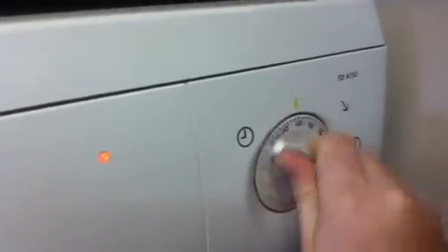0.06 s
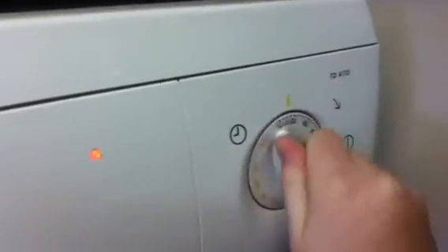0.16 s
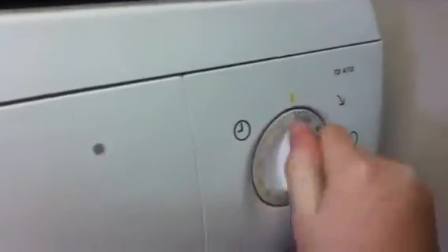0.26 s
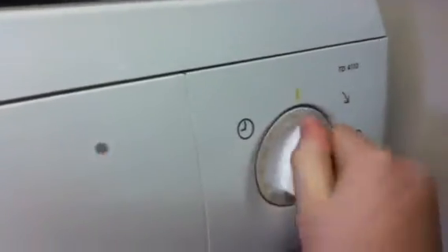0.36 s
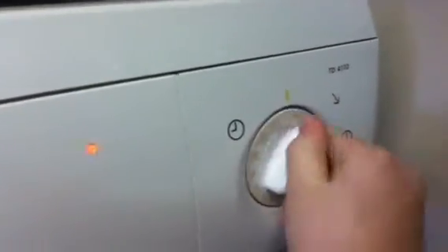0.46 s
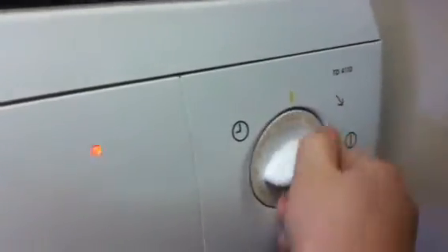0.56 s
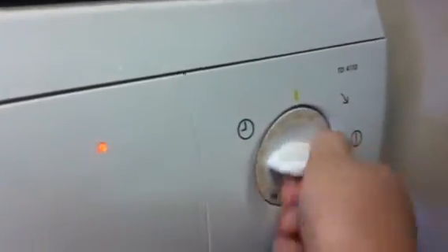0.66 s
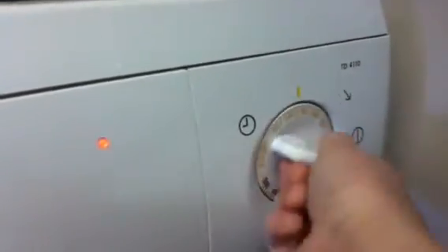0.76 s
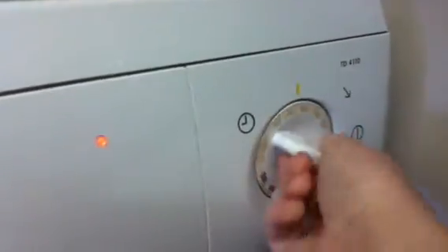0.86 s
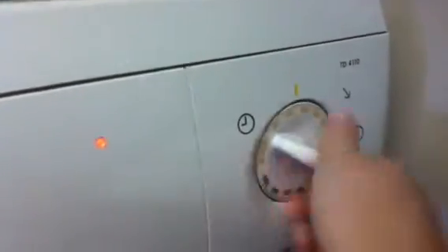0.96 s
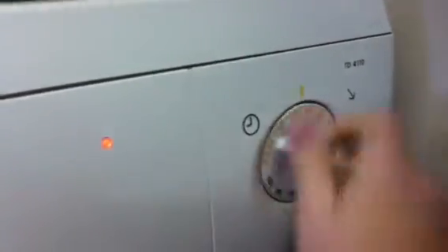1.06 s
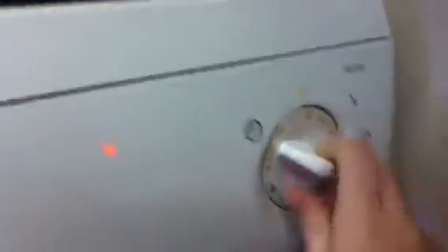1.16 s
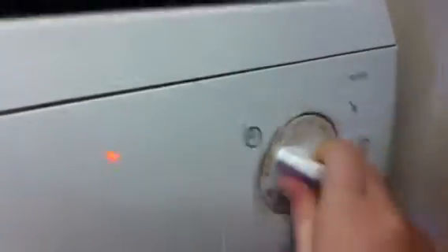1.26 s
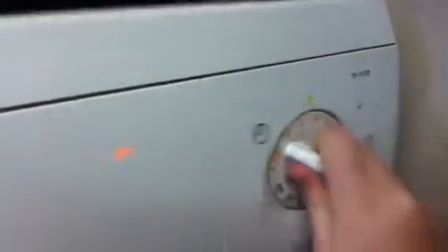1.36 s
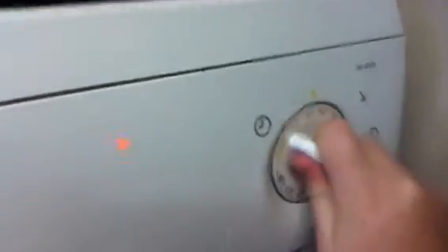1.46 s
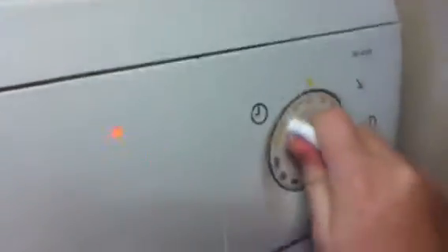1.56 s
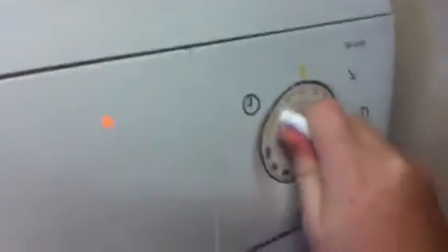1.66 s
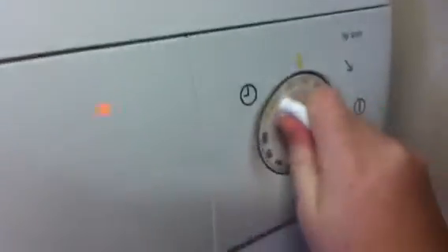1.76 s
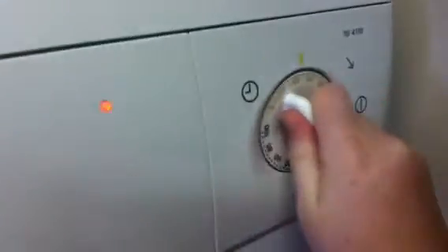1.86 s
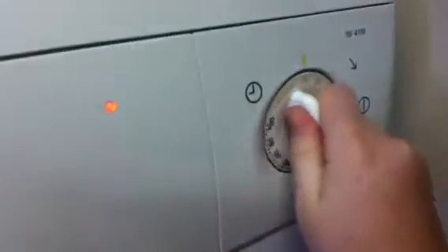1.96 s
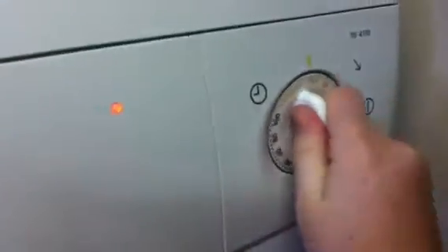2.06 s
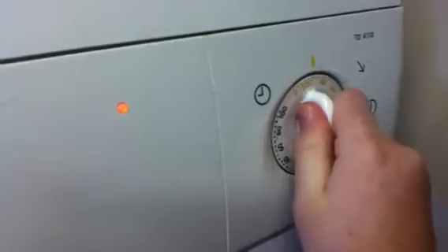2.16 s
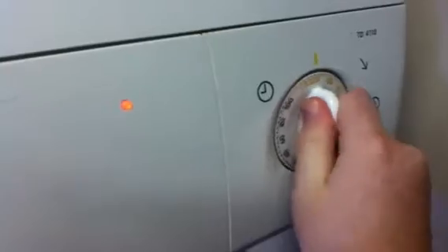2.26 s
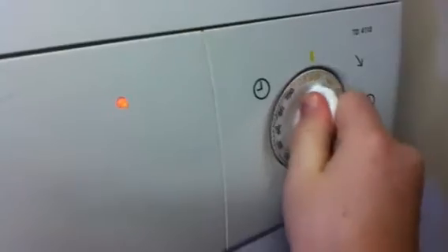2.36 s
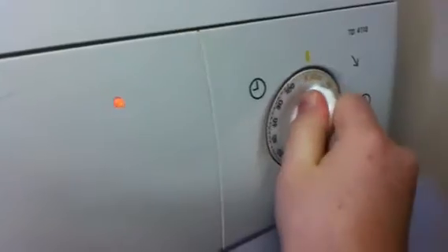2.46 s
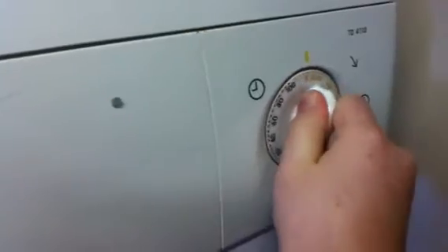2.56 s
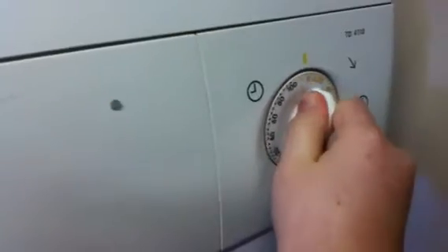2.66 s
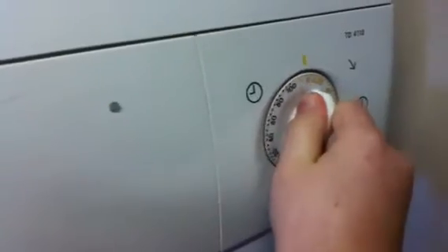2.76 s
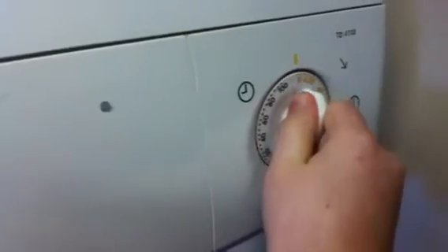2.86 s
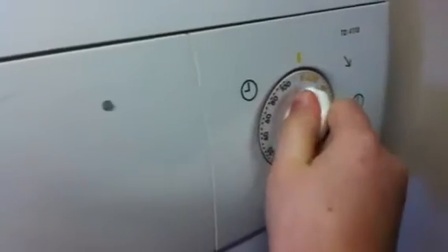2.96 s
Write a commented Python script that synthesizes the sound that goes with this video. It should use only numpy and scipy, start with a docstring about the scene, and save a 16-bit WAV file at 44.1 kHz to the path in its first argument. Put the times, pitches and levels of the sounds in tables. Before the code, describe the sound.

Close up in a small room, a plastic dial clicks rapidly with loose gear rattle, fingers let go and knock the knob, then sharp single clicks follow unevenly, each lightly thumping the hollow sheet-metal cabinet.

```python
"""A hand turns the plastic timer dial of a laundry appliance, close by in a small room.
First light finger taps, then a fast ratchet run with loose gears chattering between the clicks.
The fingers let go, rub the plastic and knock the loose knob; then the dial goes on tooth by tooth.
Clicks are filtered noise bursts plus decaying sines of pawl, spring, knob and front panel.
Clicks and knocks thump the sheet-metal cabinet; a short room tail and faint steady noise lie behind."""
import sys
import numpy as np
from scipy import signal
from scipy.fft import rfft, irfft, next_fast_len
from scipy.io import wavfile
from scipy.ndimage import map_coordinates

SR = 44100
rng = np.random.default_rng(int(sys.argv[2]) if len(sys.argv) > 2 else 0)


def generate_wav(signal):
    """Clip the signal to [-1, 1] and save it as 16-bit WAV at the path in sys.argv[1]."""
    frames = np.transpose(np.atleast_2d(signal))
    scaled = np.clip(frames, -1, 1) * 32767
    pcm = np.round(scaled).astype(np.int16)
    wavfile.write(sys.argv[1], SR, pcm)


N = 134505

# ratchet clicks: t/s, relative snap level/dB, spring level/dB, panel level/dB
RATCHET_CLICKS = [(0.1457, -8.5, -12, -17.5), (0.153, -8, -14, -18), (0.1881, -10, -28, -18),
                  (0.1957, -10, -20, -17), (0.224, -8, -19, -20), (.2445, -11, -22, -16),
                  (0.2643, -8, -20.5, -14), (0.2867, -13, -14, -16), (.311, -8.5, -10.5, -18),
                  (0.3445, -6, -1, -16.5), (0.3621, -10, -0.5, -19.5), (0.3884, -5.5, -4.5, -16.5),
                  (.412, -9, -3, -19), (.4471, -11, -9, -17.5), (.4708, -7, 3, -19.5),
                  (0.5093, -8.5, -9, -19), (0.551, -8, -26, -18), (0.5592, -5, -3.5, -22),
                  (0.5979, -9, -10, -21), (.632, -13, -23, -19.5), (0.6526, -13.5, -13, -21.5),
                  (.671, -5.5, -2, -22), (0.6891, -6, -5, -19), (0.7094, -8.5, -1, -20),
                  (.732, -10.5, -13, -20), (0.756, -6.5, -19.5, -20), (.779, -8.5, -16, -23.5),
                  (0.8145, -6, -8, -21), (.8348, -7.5, -4.5, -24.5), (0.8576, -5, -12, -19.5),
                  (0.8776, -8.5, -1.5, -20), (0.9073, -8.5, -4.5, -20.5), (0.9462, -11, -5, -19.5),
                  (1.6299, -5, -6.5, -17), (1.7046, -2.5, -4, -15.5), (1.8602, -4, -3, -19),
                  (1.9422, -4, -3.5, -19), (2.031, -7, -0.5, -21.5), (2.0834, -7, 0.5, -23.5),
                  (2.147, -6.5, -13, -25), (2.2029, -4.5, -15.5, -23.5), (2.2643, -8, -14.5, -23.5),
                  (2.358, -13, -10, -24), (2.4018, -8, -5, -23), (2.4735, -9, -3, -23),
                  (2.5153, -6, -9.5, -20.5), (2.588, -3.5, -12.5, -20), (2.771, -2, -7, -19)]
# fingers knocking the loose knob: t/s, relative knock level/dB, tick level/dB
FINGER_KNOCKS = [(0.086, -43.5, -37), (0.096, -21.5, -49.5), (1.055, -27, -39.5), (1.069, -18.5, -33),
                 (1.098, -16, -40), (1.14, -28.5, -34.5), (1.237, -18.5, -33.5), (1.25, -6.5, -24),
                 (1.277, -16, -25), (1.474, -14.5, -30.5), (1.535, -11.5, -27.5)]
# spectrum of the front panel's rattle: f/Hz, relative density/dB per Hz
PANEL_SPECTRUM = [(150, -34), (600, -16), (950, -18), (1200, -0.5), (1800, 0.5), (2700, -3), (4500, -3),
                  (7000, -10.5), (11000, -25.5), (16000, -39)]

CLICK_S, SNAP_DB, SPRING_DB, PANEL_DB = np.transpose(RATCHET_CLICKS)
KNOCK_S, KNOCK_DB, TICK_DB = np.transpose(FINGER_KNOCKS)
FAST = CLICK_S < 0.95  # clicks of the fast spin
SNAP_ATTACK_S, CONTACT_T60_S = 0.00044, 0.0071
ALIKE = 0.33  # power share of a rattle that is the same at every tooth


def amp(db):
    """Decibels to gain."""
    return 10 ** (np.asarray(db) / 20)


def unit(x):
    """Scale to rms 1."""
    return x / np.sqrt(np.mean(x ** 2) + 1e-20)


def along(points, hz):
    """Interpolate (f/Hz, value) points on a log-frequency axis."""
    f, v = np.transpose(points)
    return np.interp(np.log(hz + 1), np.log(f + 1), v)


def ring_time():
    """Time axis of one blow, 0.5 s long."""
    return np.arange(SR // 2) / SR


def envelope(attack_s, t60_s):
    """Quick rise times exponential decay."""
    t = ring_time()
    rise = 1 - np.exp(-t / attack_s)
    return rise * np.exp(-np.log(1000) * t / t60_s)


def add(track, s, x):
    """Mix x into track at s seconds, in place."""
    part = track[max(0, round(s * SR)):][:len(x)]
    part += x[:len(part)]


def coloured(x, spectrum):
    """Minimum-phase filter of the given colour; keeps the power of white noise."""
    m = 2 * next_fast_len(len(x) // 2 + SR // 8)
    gain = unit(amp(along(spectrum, np.fft.rfftfreq(m, 1 / SR))))
    cepstrum = irfft(np.log(gain))
    # fold onto positive time: makes the filter causal
    cepstrum[1:m // 2] *= 2
    cepstrum[m // 2 + 1:] = 0
    response = np.exp(rfft(cepstrum))
    return irfft(rfft(x, m) * response, m)[:len(x)]


def grainy(depth_db):
    """Rms-1 gain wandering between random levels: unevenness of tiny contacts."""
    grain_hz = 600.2
    levels = rng.standard_normal(N // 8)
    wander = map_coordinates(levels, [np.arange(N) * grain_hz / SR], order=1)
    return unit(amp(depth_db * wander))


def rattle(times, levels_db, spectrum, attack_s, t60_s, alike=0):
    """Blows on a part with dense modes: noise bursts, partly the same, partly new each time."""
    shape = envelope(attack_s, t60_s)
    track = np.zeros(N)
    own = np.sqrt(alike) * rng.standard_normal(len(shape))
    for s, db in zip(times, levels_db):
        new = np.sqrt(1 - alike) * rng.standard_normal(len(shape))
        add(track, s, amp(db) * shape * (own + new))
    return coloured(track * grainy(1.5), spectrum)


def ring(modes, attack_s, pitch, scatter, vary_db):
    """One blow on separate modes: decaying sines, random in level and pitch, alternating in sign."""
    t = ring_time()
    out = np.zeros(len(t))
    for k, (hz, db, t60_s) in enumerate(modes):
        a, b = rng.standard_normal(2)
        f = hz * pitch * (1 + scatter * b)
        level = (-1) ** k * amp(db + vary_db * a)
        out += level * envelope(attack_s, t60_s) * np.sin(2 * np.pi * f * t)
    return out


def rings(times, levels_db, modes, attack_s, pitch, scatter, vary_db):
    """A train of blows on one set of modes."""
    track = np.zeros(N)
    for s, db in zip(times, levels_db):
        add(track, s, amp(db) * ring(modes, attack_s, pitch, scatter, vary_db))
    return track


def snap():
    """The pawl scrapes over the tooth's edge, drops with a crack and lands a second time."""
    # crack: f/Hz, relative density/dB per Hz
    crack_spectrum = [(200, -21.5), (900, -11.5), (1500, -5.5), (2600, -2), (3600, -8.5), (4800, -3),
                      (7500, -3.5), (10000, -12), (12500, -18), (16000, -31.5)]
    # brighter edge of the fast clicks: f/Hz, relative density/dB per Hz
    fizz_spectrum = [(2000, -33), (9500, 2), (12700, 1), (16000, -19)]
    crack_db, crack_t60_s = SNAP_DB - 10, 0.038
    slip_s, slip_db = 0.0019, -13.5  # lead, level re crack
    bounce_s, bounce_db = 0.003, -8.5  # mean delay, level re snap
    fizz_db, fizz_t60_s = -10, 0.042

    slip = rattle(CLICK_S - slip_s, crack_db + slip_db, crack_spectrum, SNAP_ATTACK_S, crack_t60_s)
    crack = rattle(CLICK_S, crack_db, crack_spectrum, SNAP_ATTACK_S, crack_t60_s, ALIKE)
    landings = CLICK_S + bounce_s * (.5 + rng.random(len(CLICK_S)))
    bounce = rattle(landings, SNAP_DB + bounce_db, crack_spectrum, SNAP_ATTACK_S, CONTACT_T60_S)
    fizz = rattle(CLICK_S[FAST], PANEL_DB[FAST] + fizz_db, fizz_spectrum, SNAP_ATTACK_S, fizz_t60_s, ALIKE)
    return slip + crack + bounce + fizz


def pawl():
    """Each snap rings the pawl's short high modes, spread from tooth to tooth."""
    # nominal f/Hz, relative level/dB, t60/s
    pawl_modes = [(4280, -7, .017), (5170, -10.5, 0.029), (5616, -9, .023), (6420, -12.5, 0.027),
                  (7150, -8.5, 0.011)]
    return rings(CLICK_S, SNAP_DB - 4.5, pawl_modes, SNAP_ATTACK_S, pitch=1, scatter=0.013, vary_db=3)


def spring():
    """The pawl spring sounds one short sine per click; its note shifts as the dial goes round."""
    # t/s, f/Hz
    spring_notes = [(.41, 4690), (.47, 4530), (.83, 4840), (.95, 4370), (1.63, 4460), (2.08, 4830),
                    (2.42, 4400), (2.77, 4590)]
    level_db, attack_s, t60_s = SPRING_DB - 0.5, 0.0016, 0.015
    track = np.zeros(N)
    for s, db in zip(CLICK_S, level_db):
        hz = np.interp(s, *np.transpose(spring_notes))
        add(track, s, amp(db) * envelope(attack_s, t60_s) * np.sin(2 * np.pi * hz * ring_time()))
    return track


def knob():
    """Each click rings two modes of the hollow knob."""
    # f/Hz before the pitch factor, relative level/dB, t60/s
    knob_modes = [(1676, -0.5, .04), (2005, -0.5, .035)]
    return rings(CLICK_S, PANEL_DB, knob_modes, SNAP_ATTACK_S, pitch=0.97, scatter=.06, vary_db=2)


def front_panel():
    """Each click shakes the front panel: separate modes plus a dense rattle."""
    # nominal f/Hz, relative level/dB, t60/s
    panel_modes = [(1572, -14.5, 0.19), (1917, -12.5, 0.061), (2347, -17.5, 0.075), (3080, 1.5, 0.04),
                   (3354, -13.5, 0.12)]
    attack_s, rattle_db, rattle_t60_s = 0.0025, 2, 0.086
    modes = rings(CLICK_S, PANEL_DB, panel_modes, attack_s, pitch=1, scatter=0.0031, vary_db=.5)
    dense = rattle(CLICK_S, PANEL_DB + rattle_db, PANEL_SPECTRUM, attack_s, rattle_t60_s, ALIKE)
    return modes + dense


def chatter():
    """Loose gears make small extra contacts at random times during the fast spin."""
    rate_per_s, level_db, spread_db = 110, -2.5, 3.5
    times = CLICK_S[FAST]
    contacts = rng.uniform(times[0], times[-1], int(rate_per_s * np.ptp(times)))
    contact_db = np.interp(contacts, times, PANEL_DB[FAST]) + level_db
    contact_db += spread_db * rng.standard_normal(len(contacts))
    return rattle(contacts, contact_db, PANEL_SPECTRUM, SNAP_ATTACK_S, CONTACT_T60_S)


def knocks():
    """The loose knob rocks on its shaft under the fingers: tap, dull ring and light tick."""
    # dull knock: f/Hz, relative density/dB per Hz
    knock_spectrum = [(150, -27.5), (300, 4.5), (750, 4), (1400, 7.5), (2000, -1), (2800, -9.5),
                      (6000, -18.5), (14000, -50.5)]
    # light tick: f/Hz, relative density/dB per Hz
    tick_spectrum = [(500, -15.5), (2000, 12), (4500, 6.5), (7000, 4.5), (11000, -12), (16000, -29)]
    tap = rattle(KNOCK_S, KNOCK_DB - 4, knock_spectrum, SNAP_ATTACK_S, t60_s=0.0025)
    dull = rattle(KNOCK_S, KNOCK_DB - 13.5, knock_spectrum, SNAP_ATTACK_S, t60_s=0.12)
    tick = rattle(KNOCK_S, TICK_DB + .5, tick_spectrum, SNAP_ATTACK_S, t60_s=0.042)
    return tap + dull + tick


def shaft():
    """Each finger knock rings the knob's mounting with a hollow note."""
    # nominal f/Hz, relative level/dB, t60/s
    shaft_modes = [(308, -22, .13), (672, -21, 0.15), (904.5, -25.5, 0.071), (1085, -21.5, 0.13),
                   (1368, -21, 0.049), (1576, -19.5, 0.098), (1883, -23, .06)]
    return rings(KNOCK_S, KNOCK_DB, shaft_modes, SNAP_ATTACK_S, pitch=1, scatter=0.016, vary_db=3)


def rub():
    """Fingers slide on the plastic: grainy coloured noise under a slow level curve."""
    # t/s, level/dB
    rub_levels = [(0.98, -50), (1.08, -41), (1.2, -50.5), (1.42, -50), (1.6, -64.5), (2.7, -54),
                  (2.9, -59.5)]
    # f/Hz, relative density/dB per Hz
    rub_spectrum = [(200, 3.5), (700, 1.5), (1800, -6.5), (4000, -17), (14000, -26)]
    skin = unit(coloured(rng.standard_normal(N) * grainy(3), rub_spectrum))
    level_db = np.interp(np.arange(N) / SR, *np.transpose(rub_levels))
    return skin * amp(level_db)


def cabinet():
    """Clicks and knocks thump the sheet-metal box, which rings on in low modes."""
    # f/Hz before the pitch factor, relative level/dB, t60/s
    cabinet_modes = [(172.7, -5, 0.33), (191.6, -2.5, 0.32), (213.1, -3.5, 0.32), (298.3, -5, 0.23),
                     (347.4, -2.5, 0.16), (396.4, -6.5, 0.15), (494.5, -9, 0.29), (641.8, 3, 0.094),
                     (788, -18, .17)]
    # thump: f/Hz, relative density/dB per Hz
    thump_spectrum = [(30, -27), (70, -19.5), (100, -7.5), (135, -11), (175, -1), (230, 0), (340, 0),
                      (530, -7), (680, -3.5), (1200, -5), (3000, -44.5)]
    attack_s, thump_t60_s = 0.00062, 0.16
    modes_db, thump_db = -13.5, -8
    follows = .5  # the thump varies less from tooth to tooth than the panel's rattle
    spin_db, knock_db = 2, -12  # fast spin shakes it harder, fingers less

    usual_db = np.mean(PANEL_DB)
    click_db = usual_db + follows * (PANEL_DB - usual_db) + spin_db * FAST
    times = np.concatenate([CLICK_S, KNOCK_S])
    levels_db = np.concatenate([click_db, KNOCK_DB + knock_db])
    box = rings(times, levels_db + modes_db, cabinet_modes, attack_s, pitch=0.98, scatter=0.0073, vary_db=0.5)
    return box + rattle(times, levels_db + thump_db, thump_spectrum, attack_s, thump_t60_s)


def room(x, count=24):
    """Small room: decaying-noise tails, lows lasting longest, drawn anew for each stretch of time."""
    # f/Hz, t60/s
    room_t60 = [(150, 0.92), (400, 0.61), (1200, 0.17), (3000, 0.26), (5000, 0.18), (14000, 0.18)]
    # f/Hz, relative level/dB
    room_spectrum = [(200, -3), (1200, 3.5), (4500, -6), (15000, -16)]
    delay_s = .009
    wet = np.zeros(N)
    for stretch in np.array_split(np.arange(N), count):
        hz, t, z = signal.stft(rng.standard_normal(SR // 2), SR, nperseg=256)
        decay = np.exp(-np.log(1000) * t / along(room_t60, hz)[:, None])
        tail = signal.istft(z * decay, SR)[1]
        tail /= np.linalg.norm(tail)
        add(wet, stretch[0] / SR + delay_s, signal.fftconvolve(x[stretch], tail))
    return coloured(wet, room_spectrum)


def room_noise():
    """Faint steady noise, strongest in the lows."""
    # f/Hz, relative density/dB per Hz
    air_spectrum = [(15, -45.5), (25, -24), (212, 10.5), (560, -17.5), (1130, -43), (1400, -29.5),
                    (2480, -29), (16000, -36.5)]
    return amp(-50) * unit(coloured(rng.standard_normal(N), air_spectrum))


def scene():
    """Ratchet, fingers, cabinet, room tail and room noise; one channel."""
    ratchet = snap() + pawl() + spring() + knob() + front_panel() + chatter()
    fingers = knocks() + shaft() + rub()
    direct = ratchet + fingers + cabinet()
    return (direct + amp(-18) * room(direct) + room_noise())[None]


def record(dry):
    """Round off the highest peaks, then cut everything above the band limit."""
    peak_db, top_hz = -2, 16100
    soft = dry / (1 + np.abs(dry / amp(peak_db)) ** 6) ** (1 / 6)
    m = next_fast_len(N + SR // 2)
    band = np.fft.rfftfreq(m, 1 / SR) < top_hz
    return irfft(rfft(soft, m) * band, m)[..., :N]


dry = scene()
out = record(dry)
generate_wav(out)
```